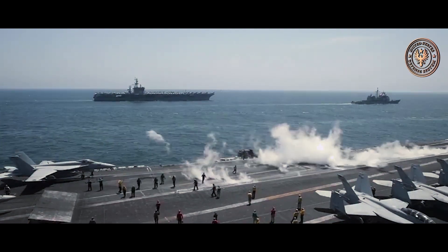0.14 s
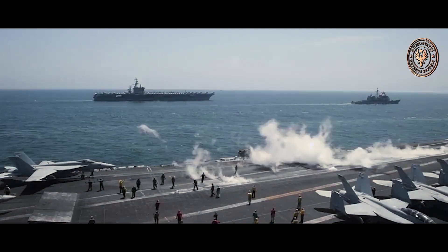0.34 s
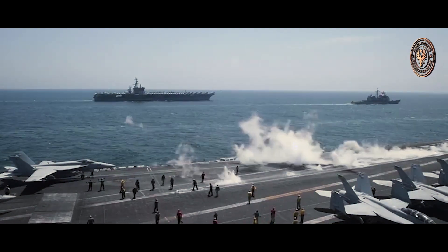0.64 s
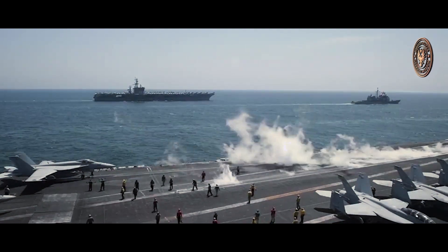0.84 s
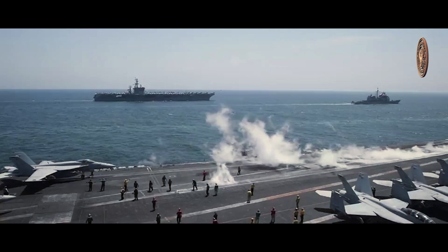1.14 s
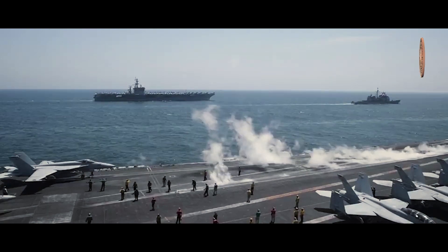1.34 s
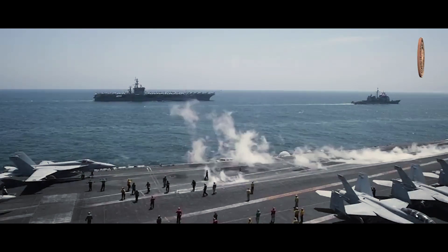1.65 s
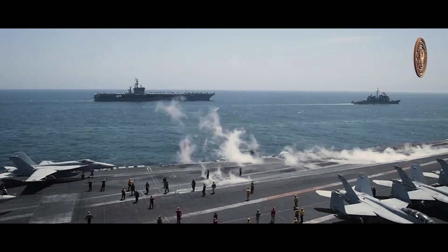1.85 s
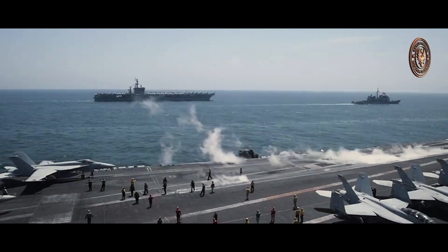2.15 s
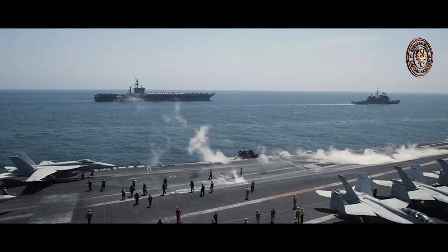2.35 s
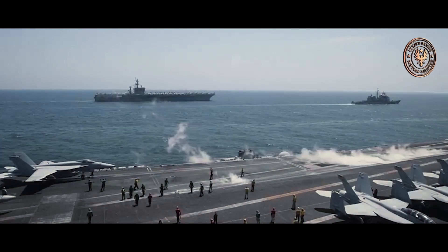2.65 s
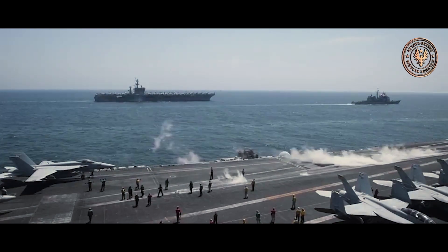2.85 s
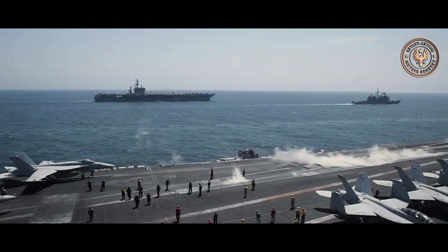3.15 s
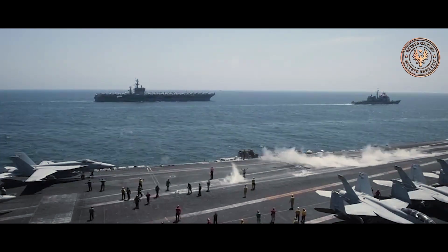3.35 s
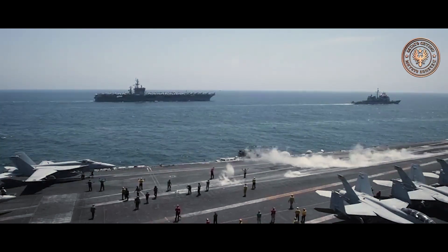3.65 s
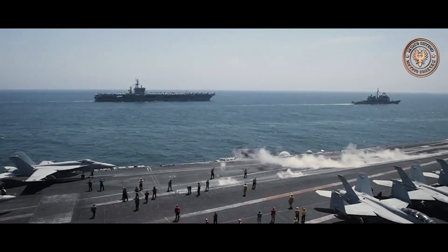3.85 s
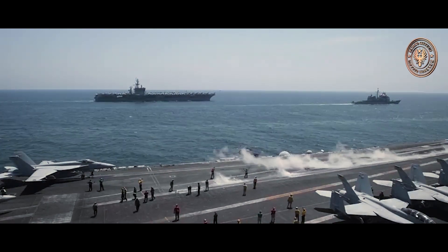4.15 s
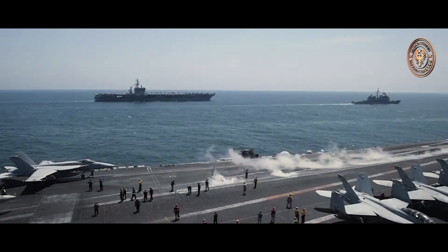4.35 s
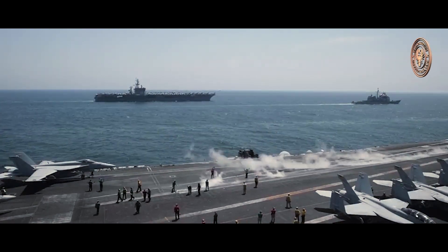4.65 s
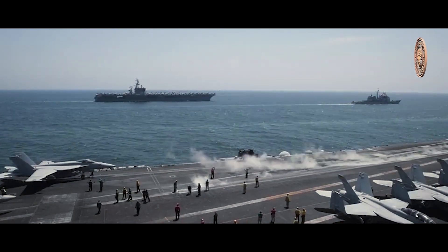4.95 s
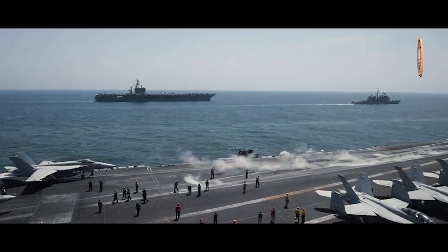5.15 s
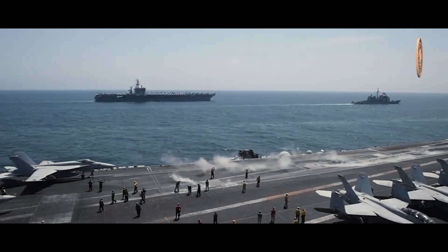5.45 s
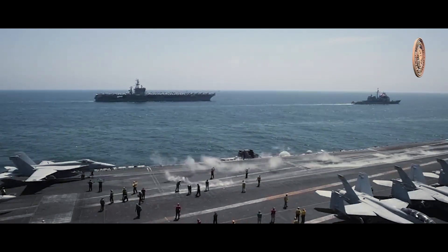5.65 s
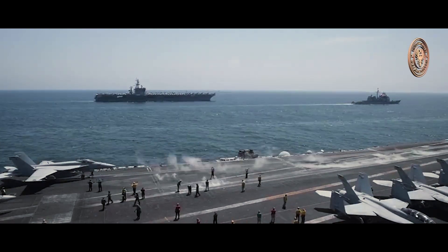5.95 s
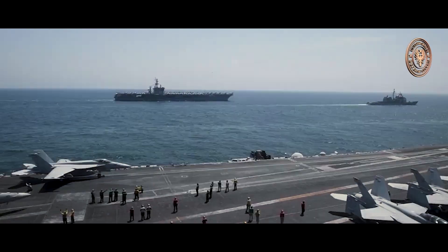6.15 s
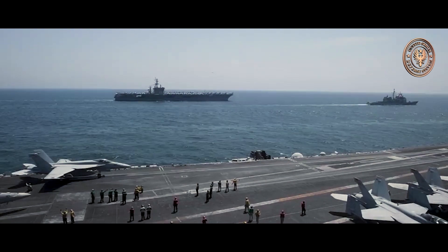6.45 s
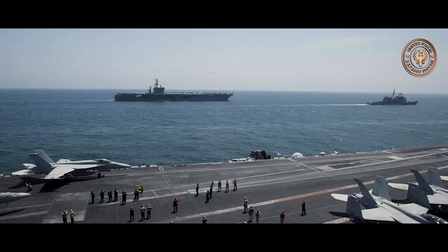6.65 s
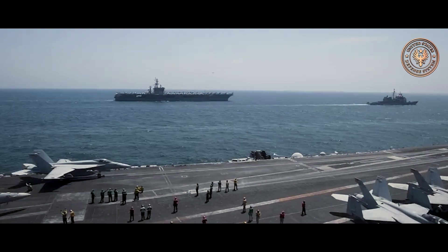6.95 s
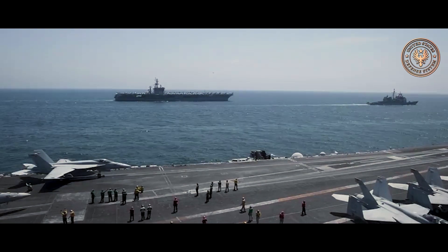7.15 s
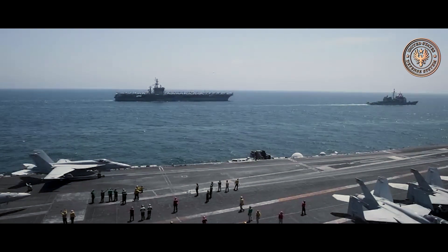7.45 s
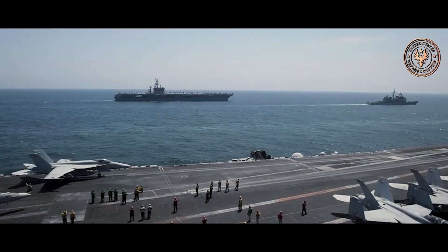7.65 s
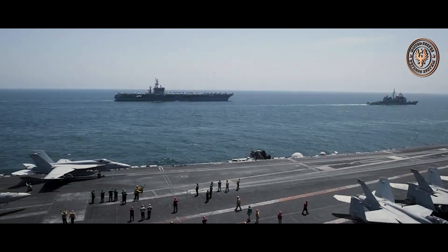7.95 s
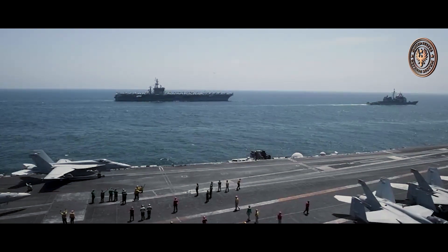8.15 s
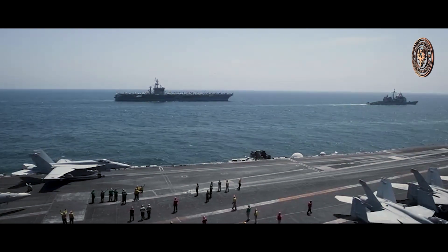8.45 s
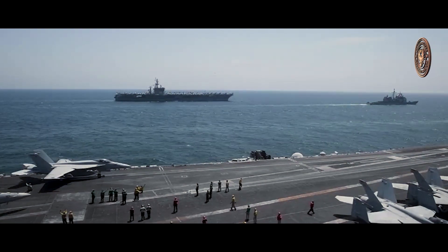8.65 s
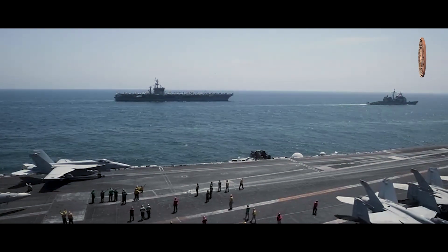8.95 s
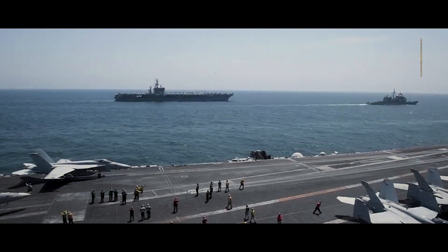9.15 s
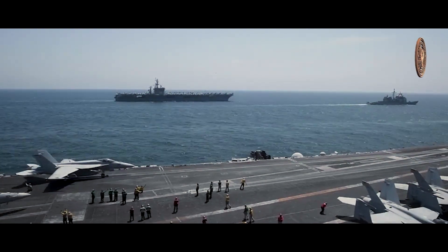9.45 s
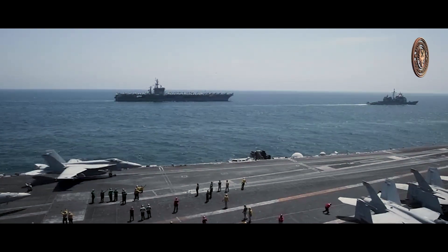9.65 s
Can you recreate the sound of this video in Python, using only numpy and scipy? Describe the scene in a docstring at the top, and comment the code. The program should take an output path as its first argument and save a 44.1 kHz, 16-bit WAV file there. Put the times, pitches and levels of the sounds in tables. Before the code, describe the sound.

Heard in stereo from above a ship's flight deck: quiet idling jet engines first, rumbling and hissing with a smeared high whine that swells and fades, plus one soft wind-like buffet early on. A sudden cut brings a jet at full power, far louder, a broad, nearly constant roar with resonant metallic colouring and hiss leaning left. The sound blinks out for an instant about two seconds later, then continues to the end.

```python
"""A carrier flight deck, heard from the island through two microphone ports.
First, idling jets: buffeting, rumble and hiss from shaped noise, and a blurred turbine whine from
overtones of wandering pitches. Then a quick cut to a jet at full power: a wide roar and a hiss leaning
left, again from shaped noise. The sound drops out once for a moment."""
import sys
import numpy as np
from scipy import signal
from scipy.io import wavfile
from scipy.ndimage import uniform_filter1d

SR = 44100
rng = np.random.default_rng(int(sys.argv[2]) if len(sys.argv) > 2 else 0)


def wav_record(signal):
    """Record a signal, one row per channel, as 16-bit PCM in the file named by sys.argv[1]."""
    frames = np.transpose(np.atleast_2d(signal))
    bounded = np.clip(frames, -1, 1)
    # unit amplitude maps onto the largest positive 16-bit level
    quanta = np.round(bounded * 32767).astype(np.int16)
    wavfile.write(sys.argv[1], SR, quanta)


N = 433062  # samples


def gain_of(db):
    """Turns decibels into an amplitude factor."""
    return 10 ** (np.asarray(db) / 20)


def evened(x):
    """Scales so that the mean of the channels has rms 1."""
    mid = np.atleast_2d(x).mean(0)
    return x / np.sqrt(np.mean(mid ** 2) + 1e-20)


def columns(rows, at, bend=lambda v: v):
    """Reads each later column of a table at the given places of its first; bend warps that axis."""
    first, *rest = np.transpose(rows)
    return [np.interp(bend(at), bend(first), column) for column in rest]


def drift(shape, widths):
    """Smooth random motion of rms 1: noise averaged twice along each axis."""
    x = rng.standard_normal(shape)
    for axis, width in enumerate(widths):
        width = max(int(width), 1)
        x = uniform_filter1d(uniform_filter1d(x, width, axis), width, axis)
    return x / x.std()


FFT, HOP = 2048, 512  # short-time spectra, samples
BINS = FFT // 2 + 1
PATCH_SHARE = 0.3  # share of time and pitch that the patches cover


def frame_count(length):
    """Number of short-time spectra that cover the length."""
    return length // HOP + 5


def likeness_patches(length):
    """Random small patches of time and pitch that hold more of the channels' difference; mean 1."""
    x = drift((frame_count(length), BINS), (3, 5)).T
    return (x > np.quantile(x, 1 - PATCH_SHARE)) / PATCH_SHARE


BUFFET_DB, BUFFET_S = 2, 0.12  # rms unevenness, smoothing width


def buffeting_db(t):
    """Slow random unevenness of the deepest layer, in dB."""
    return BUFFET_DB * drift(len(t), (BUFFET_S * SR,))


STEEL_WANDER, STEEL_UNEVEN_DB = 0.024, 2  # rms drift of the lifted bands: share of pitch, strength


def steelwork_db(peaks, hz, frames):
    """Steelwork around the microphone lifts resonant bands that drift in pitch and strength."""
    lift_db = 0
    for f, width, db in peaks:
        height_db = db + STEEL_UNEVEN_DB * drift(frames, (4,))
        centre = f * (1 + STEEL_WANDER * drift(frames, (10,)))
        lift_db = lift_db + height_db / (1 + (2 * (hz[:, None] - centre) / width) ** 2)
    return lift_db


def turbulence(length, colour, ports, patches, patchy_db, flicker_db, waver, peaks=()):
    """Jet noise: random short-time spectra with drifting level and gusts shared over wide bands."""
    frames, hz = frame_count(length), np.fft.rfftfreq(FFT, 1 / SR)
    a, b, c, d = rng.standard_normal((frames, BINS, 4)).T
    local_db = patchy_db * drift((frames, BINS), (3, 16)).T
    gusts_db = flicker_db * drift((frames, BINS), (2, 180)).T
    same, lead, left_db = (v[:, None] for v in columns(ports, hz))

    # where the two channels are much alike, their difference gathers in the patches
    waver = np.clip(waver * same ** 2, 0, 1)
    unlike = (1 - same) * (1 - waver + waver * patches)
    same = np.clip(1 - unlike, 0, 1)
    left, other = a + 1j * b, c + 1j * d
    right = (same * left + np.sqrt(1 - same ** 2) * other) * np.exp(-1j * lead)
    spectra = np.array([left * gain_of(left_db / 2), right * gain_of(-left_db / 2)])

    colour_db = columns(colour, hz, np.log1p)[0][:, None]
    spectra *= gain_of(colour_db + steelwork_db(peaks, hz, frames) + local_db + gusts_db)
    noise = signal.istft(spectra, nperseg=FFT, noverlap=FFT - HOP)[1]
    return evened(noise[:, :length])


# overtones of a turbine's whine:
# (multiple of the pitch, level/dB, blur/Hz, port likeness -1 to 1, left over right/dB)
WHINE_OVERTONES = [(2, -4.5, 13.6, 0.5, -3), (3, -14, 14, -0.8, -1), (4, -10, 36, .6, -2),
                   (5, 2, 50, 0.24, -4), (6, -6, 48, 0, -3), (7, -9.5, 60, 0.9, 0), (8, -12, 70, 0.3, -2),
                   (9, -15, 110, .3, 0), (10, -16, 130, .2, 0)]
WHINE_LAG_S = 0.0001  # left hears it later
WHINE_FADING_DB, WHINE_FADING_S = 2.5, 0.033  # each overtone comes and goes on the wind


def whine(length, pitch_hz, wander=0.0019):
    """Turbine: multiples of one wandering pitch, each blurred by turbulent air, most of all the high ones."""
    turns = np.cumsum(pitch_hz * (1 + wander * drift(length, (900,)))) / SR
    out = np.zeros((2, length))
    for order, db, blur_hz, same, left_db in WHINE_OVERTONES:
        # slow complex noise spreads the pure tone into a narrow band
        air = rng.standard_normal((2, length)) + 1j * rng.standard_normal((2, length))
        air = signal.lfilter(*signal.butter(3, blur_hz, fs=SR), air)
        left, other = air / np.sqrt(np.mean(abs(air) ** 2))
        right = same * left + np.sqrt(1 - same ** 2) * other
        right = right * np.exp(2j * np.pi * order * pitch_hz * WHINE_LAG_S)
        pair = np.array([left * gain_of(left_db / 2), right * gain_of(-left_db / 2)])
        tone = (pair * np.exp(2j * np.pi * order * turns)).real
        fading_db = WHINE_FADING_DB * drift(length, (WHINE_FADING_S * SR,))
        out += gain_of(db + fading_db) * tone
    return evened(out)


# idling engines; fainter ones run a little faster: (turbine pitch f/Hz, level/dB)
IDLE_ENGINES = [(1002.5, 0), (1015, -6.5), (1029, -12)]


def idling_turbines(length):
    """Sums the whines of several engines whose pitches lie close together."""
    return evened(sum(gain_of(db) * whine(length, hz) for hz, db in IDLE_ENGINES))


# spectral colours of the idling jets' buffeting, rumble and hiss: (f/Hz, level per Hz/dB)
IDLE_DEEP_COLOUR = [(10, -30), (25, -23), (40, -16), (60, 7), (100, 2), (140, 5), (200, -34), (300, -80)]
IDLE_RUMBLE_COLOUR = [(25, -50), (50, -34), (100, -11.5), (130, -7), (160, -1.5), (200, -0.5), (250, -1),
                      (400, -5), (650, -8), (1000, -8.5), (1400, -16.5), (2200, -58), (2600, -90)]
IDLE_HISS_COLOUR = [(200, -25), (700, -6), (1200, 0), (1650, 4.5), (2200, 4), (2600, 2), (3000, 2),
                    (3500, 0), (4600, 0.5), (4680, 0), (4780, -2), (4900, 2.5), (5500, 1.5), (7500, -1),
                    (8600, -5.5), (9600, -7.5), (10500, -5), (11300, 0.5), (12300, -7.5)]
# idling jets at the port pair: (f/Hz, likeness 0 to 1, left leads by/rad, left over right/dB)
IDLE_PORT_PAIR = [(100, .79, .02, -.2), (200, .98, 0, -.1), (400, .87, -.04, -.3), (950, .5, -.3, -.5),
                  (1250, .15, -1.1, -.9), (1650, .38, -2.45, -1.3), (1850, .39, -2.55, -1.8),
                  (2200, .5, -2.7, -1.8), (2600, .64, -2.95, -.7), (2900, .81, -3.14, 0),
                  (3450, .84, -3.14, 0), (3750, .75, -3.16, -.1), (4050, .6, -3.45, -1),
                  (4450, .18, -3.3, -1.8), (4640, .3, -3.2, -1), (4720, .72, -3.14, 0),
                  (4790, .7, -3.14, 0), (4870, .2, -3.6, -2), (5500, .13, -4.51, -2.3),
                  (7400, .5, -6.4, -.8), (8500, .19, -6.65, -.6), (12300, .04, -12, -.5)]
# low end over its steady level: (t/s, level/dB)
IDLE_LOW_SWELL = [(0, 2), (.1, 4), (.2, 2.5), (.3, 3), (.5, 1.5), (.85, 0.5), (1.05, 1.5), (1.35, -0.5),
                  (1.5, 2.5), (1.75, 0), (2.6, -1.1), (3.8, -0.5), (4.4, -1.2), (5.3, 0), (5.7, 0),
                  (6.2, 0.5)]
# treble over its steady level, as the wind carries it: (t/s, level/dB)
IDLE_TREBLE_SWELL = [(0, 1.3), (.7, -0.5), (.84, 4), (.95, 11), (1.06, 2.5), (1.25, -1.5), (1.6, 0.7),
                     (1.8, 2.8), (2.4, 1.5), (2.62, 3.5), (2.85, -2), (3.05, 0.5), (3.45, 1.8), (3.7, -0.5),
                     (4.25, -1), (4.65, -1.5), (4.85, 0), (5.05, -3.5), (5.65, 3), (6.2, -2.5)]
IDLE_DEEP_DB, IDLE_RUMBLE_DB, IDLE_HISS_DB, IDLE_WHINE_DB = -54, -36, -38.5, -41  # steady levels
DEEP_FOLLOW = 1.3  # dB of buffeting for each dB of low swell
HISS_FOLLOW, WHINE_FOLLOW = 0.39, 0.67  # dB of each layer for each dB of treble swell
THUMP_S, THUMP_DB, THUMP_FADE_S = 1.48, 13, 0.09  # one buffet lands and dies away
PATCH_WAVER = 2.1  # how fully the channels' difference gathers in patches


def idling_jets(t):
    """Buffeting, rumble, hiss and whine: low and treble layers swell separately, as the wind carries them."""
    length, patches = len(t), likeness_patches(len(t))
    low_db, treble_db = columns(IDLE_LOW_SWELL, t)[0], columns(IDLE_TREBLE_SWELL, t)[0]
    thump_db = THUMP_DB * (t > THUMP_S) * np.exp(-((t - THUMP_S) / THUMP_FADE_S) ** 2)
    deep_db = IDLE_DEEP_DB + DEEP_FOLLOW * low_db + thump_db + buffeting_db(t)

    deep = turbulence(length, IDLE_DEEP_COLOUR, IDLE_PORT_PAIR, patches,
                      patchy_db=0.5, flicker_db=1.5, waver=0.05)
    rumble = turbulence(length, IDLE_RUMBLE_COLOUR, IDLE_PORT_PAIR, patches,
                        patchy_db=1.27, flicker_db=0.5, waver=0.1)
    hiss = turbulence(length, IDLE_HISS_COLOUR, IDLE_PORT_PAIR, patches,
                      patchy_db=2.5, flicker_db=0.85, waver=PATCH_WAVER)
    mix = gain_of(deep_db) * deep
    mix += gain_of(IDLE_RUMBLE_DB + low_db) * rumble
    mix += gain_of(IDLE_HISS_DB + HISS_FOLLOW * treble_db) * hiss
    mix += gain_of(IDLE_WHINE_DB + WHINE_FOLLOW * treble_db) * idling_turbines(length)
    return mix


# spectral colours of the full-power buffeting, roar and hiss: (f/Hz, level per Hz/dB)
FULL_DEEP_COLOUR = [(10, -36), (25, -26), (40, -20), (60, -7), (100, -9), (140, -3.5), (200, -24.5),
                    (300, -80)]
FULL_ROAR_COLOUR = [(25, -60), (60, -43), (120, -7), (170, -5.5), (250, -4), (400, -3.5), (550, -2),
                    (800, 0), (1100, 0), (1500, .5), (2100, 0), (2450, -4), (2900, -16), (3600, -45),
                    (4500, -90)]
FULL_HISS_COLOUR = [(500, -50), (1500, -16), (2100, -6), (2450, -1), (2900, -1), (3500, -2.3), (4200, -3.5),
                    (5200, -3.3), (6500, -6), (8000, -9), (10000, -13), (12500, -15.5)]
# full-power jet at the port pair: (f/Hz, likeness 0 to 1, left leads by/rad, left over right/dB)
FULL_PORT_PAIR = [(100, .47, -.02, -1.2), (200, .79, -.05, -1.1), (300, .62, .16, -.3), (450, .36, .6, -.6),
                  (800, .52, .7, -1.4), (1200, .44, 1.1, -.6), (1450, .33, 1.6, -3.2),
                  (1650, .52, 2.4, -.6), (1830, .46, 2.2, -1.5), (2000, .68, 2.9, -1.2),
                  (2180, .92, 3.14, 0), (2450, .95, 3.14, 0), (2750, .87, 3.14, 0), (2920, .78, 3.2, .1),
                  (3200, .38, 3.68, 2), (3550, .2, 3.4, 3.5), (4100, .45, 3.01, 2.2), (4700, .32, 3.45, .7),
                  (5300, .22, 4.8, 1.6), (6500, .41, 6.24, .7), (8300, .05, 6.92, 3.3),
                  (12300, .12, 10.17, 1.3)]
# bands that the steelwork around the microphone lifts out of the roar: (f/Hz, width/Hz, level/dB)
STEELWORK_BANDS = [(193.4, 15, 8.5), (365, 72, 3), (539, 49, 6.5), (693, 35, 4), (1073, 78, 3.5),
                   (1290, 55, 3), (1830, 60, 2)]
# roar over its steady level: (t/s, level/dB)
FULL_ROAR_SWELL = [(6.1, -0.5), (6.36, 2.5), (6.62, -2.5), (6.9, -0.6), (7.07, -0.8), (7.25, 0.5),
                   (7.5, -1), (7.8, 1.1), (8.2, -.5), (8.55, -0.5), (8.8, 0.5), (9.1, 0.5), (9.3, -2),
                   (9.65, 0.5), (9.82, -0.9)]
FULL_DEEP_DB, FULL_ROAR_DB, FULL_HISS_DB = -42, -18.5, -21.5  # steady levels
HISS_TRADE = -0.46  # dB of hiss for each dB of roar swell: hiss comes forward when the roar sags


def full_power(t):
    """Jet at full power: large eddies roar, fine ones hiss, over a deep buffeting."""
    length, patches = len(t), likeness_patches(len(t))
    swell_db = columns(FULL_ROAR_SWELL, t)[0]
    deep = turbulence(length, FULL_DEEP_COLOUR, FULL_PORT_PAIR, patches,
                      patchy_db=1.0, flicker_db=1.5, waver=0.05)
    roar = turbulence(length, FULL_ROAR_COLOUR, FULL_PORT_PAIR, patches,
                      patchy_db=1.32, flicker_db=0.0, waver=PATCH_WAVER, peaks=STEELWORK_BANDS)
    hiss = turbulence(length, FULL_HISS_COLOUR, FULL_PORT_PAIR, patches,
                      patchy_db=1.5, flicker_db=0.3, waver=PATCH_WAVER)
    mix = gain_of(FULL_DEEP_DB + buffeting_db(t)) * deep
    mix += gain_of(FULL_ROAR_DB + swell_db) * roar
    mix += gain_of(FULL_HISS_DB + HISS_TRADE * swell_db) * hiss
    return mix


DROP_S, SILENT_S, BACK_S = 8.11, 8.134, 8.1492  # remnant starts, silence starts, sound snaps back
REMNANT_DB, REMNANT_FADE_DB_PER_S = -18, -450


def dropout():
    """Gain over time: one, a faint remnant dying away, nothing, one again."""
    t = np.arange(N) / SR
    remnant_db = REMNANT_DB + REMNANT_FADE_DB_PER_S * np.clip(t - DROP_S, 0, 1)
    remnant = gain_of(remnant_db) * (t < SILENT_S)
    return np.where((t < DROP_S) | (t >= BACK_S), 1, remnant)


CUT_S, CUT_FADE_S = 6.172, 0.022  # middle and length of the crossfade


def scene():
    """Idling jets, then full power, joined by a short crossfade."""
    t = np.arange(N) / SR
    later = np.clip((t - CUT_S) / CUT_FADE_S + 0.5, 0, 1)
    first, second = t < 6.3, t > 6.0  # spans that reach past the crossfade
    out = np.zeros((2, N))
    out[:, first] += (1 - later[first]) * idling_jets(t[first])
    out[:, second] += later[second] * full_power(t[second])
    return out


HEADROOM = 1.8  # soft ceiling, full scale 1
EDGE_HZ = 12430  # upper band limit


def record(dry):
    """The preamplifier rounds off the highest peaks; then the dropout and a steep low-pass."""
    gated = HEADROOM * np.tanh(dry / HEADROOM) * dropout()
    edge = signal.firwin(1023, EDGE_HZ, window=("kaiser", 6), fs=SR)
    return signal.oaconvolve(gated, edge[None], "same")


dry = scene()
out = record(dry)
wav_record(out)
```